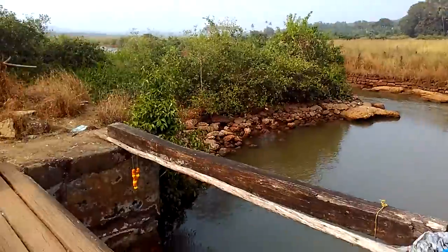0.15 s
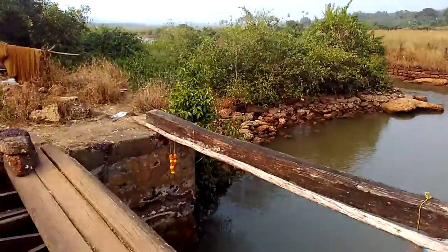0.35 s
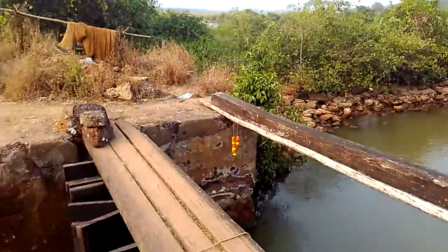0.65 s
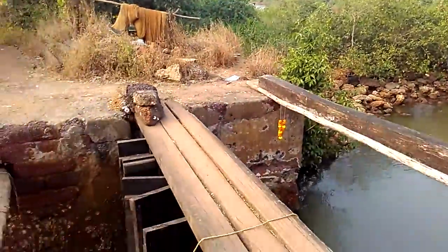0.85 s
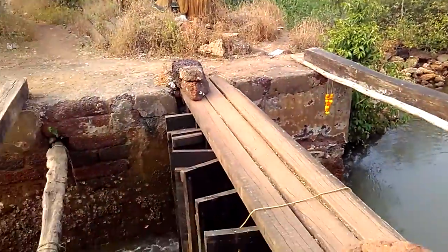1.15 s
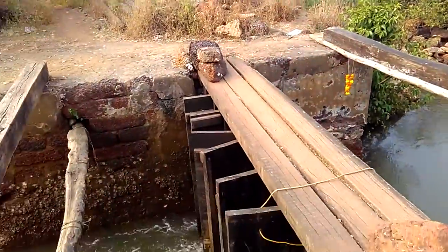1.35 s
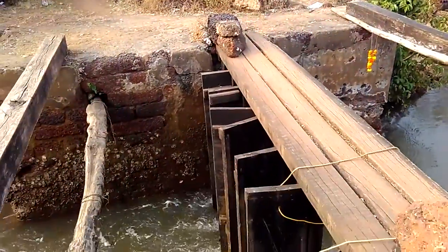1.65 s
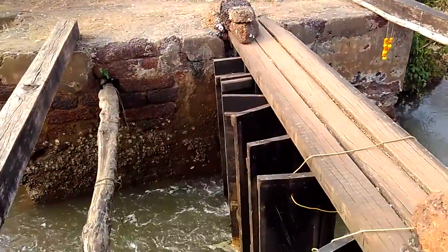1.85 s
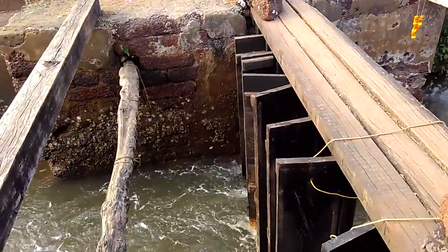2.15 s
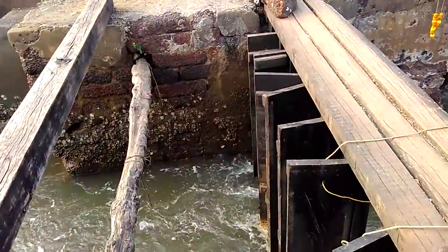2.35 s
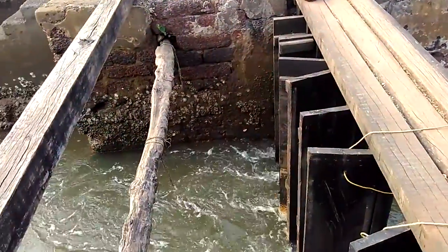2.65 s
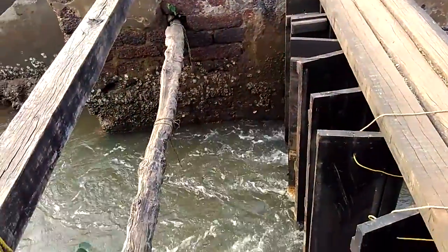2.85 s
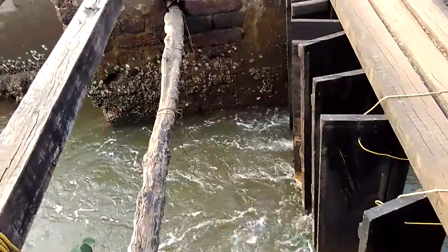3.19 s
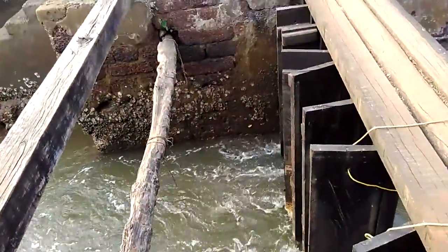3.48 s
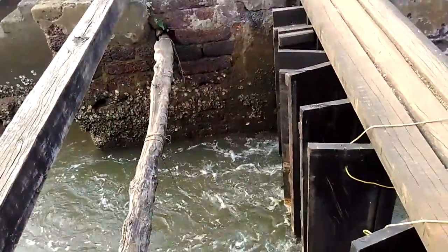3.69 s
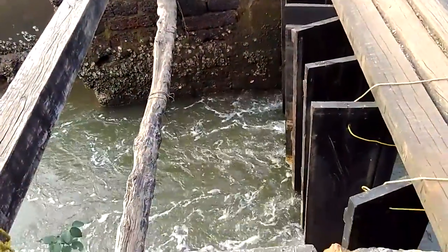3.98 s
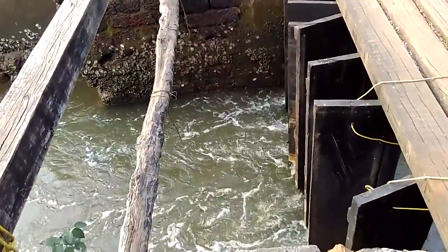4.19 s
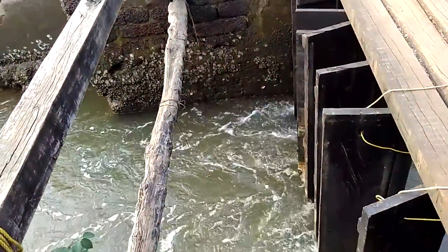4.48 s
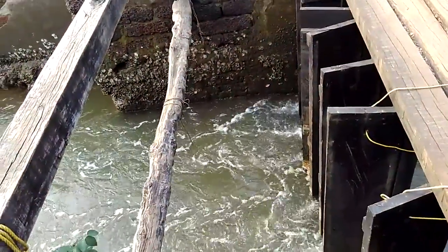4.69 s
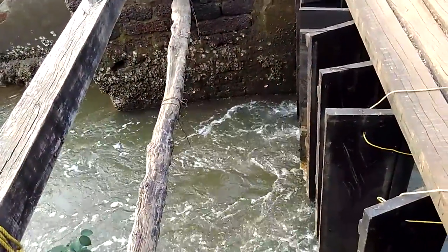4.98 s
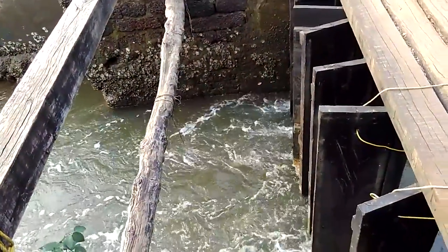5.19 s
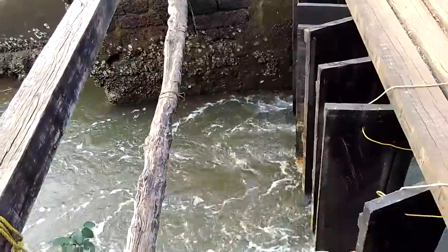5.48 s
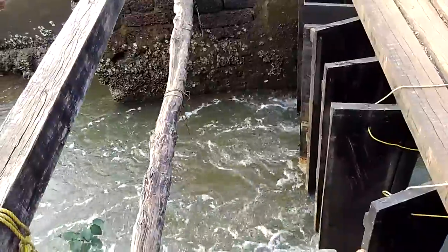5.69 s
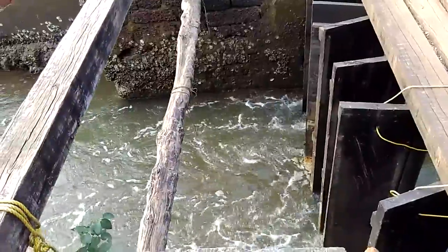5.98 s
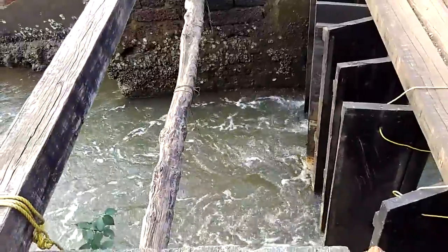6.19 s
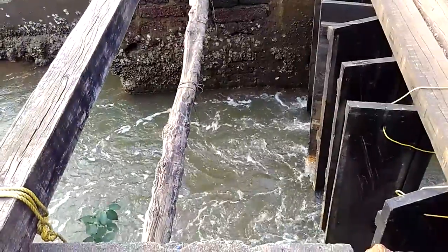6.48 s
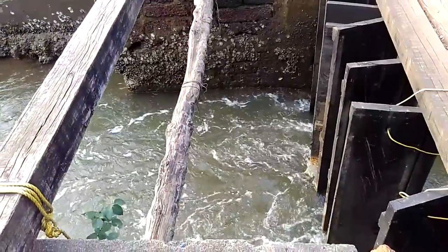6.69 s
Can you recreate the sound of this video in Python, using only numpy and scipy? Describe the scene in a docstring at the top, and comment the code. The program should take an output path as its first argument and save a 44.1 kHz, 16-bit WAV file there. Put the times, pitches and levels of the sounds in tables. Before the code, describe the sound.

Throughout almost seven seconds, stream water rushes through a small wooden sluice in a masonry channel: a dense, foamy wash with middle-pitched churning, fine spray and few distinct bubbles. At first it is heard from aside; from about 2.5 s, as the microphone turns, it grows more open. Gurgling is fullest at 1.7-2.3 s, then eases. Tiny bright drips tick, mostly leftward, with louder ones near 0.5, 2.86 and 5.5 s. Small gulps include a plink at 2.64 s and a lower plop at 4.35 s. A quick hollow clunk sounds at 2.1 s, among strong low wind thumps on the left until 2.4 s. At 3.17 s a sharp, dry click snaps close on the left, with little rebounds and a short hissing tail. Breeze rumbles softly, lulling around 4.2-4.5 s; a very deep bump hits the right at 6 s, and a gust swells at the end.

```python
"""In a masonry channel, a stream pours between the boards of a small wooden sluice; the listening side turns.
Foam noise, ringing bubbles and fine bursts of spray make the rush, coloured and surging differently by pitch.
Puffs of noise tick as drops; short swings of pressure gulp among the boards and make one hollow clunk.
Wind rumbles and bumps now one, now the other of two microphone ports: slow noise and low swings.
One sharp click, made of noise bursts and a fluttering tail of echoes and hiss, sounds close on the left."""
import sys
import numpy as np
from scipy import signal
from scipy.fft import rfft, irfft
from scipy.io import wavfile
from scipy.ndimage import uniform_filter1d, map_coordinates

SR = 44100
rng = np.random.default_rng(int(sys.argv[2]) if len(sys.argv) > 2 else 0)


def wav_record(signal):
    """Record a signal, one row per channel, as 16-bit PCM in the file named by sys.argv[1]."""
    frames = np.transpose(np.atleast_2d(signal))
    bounded = np.clip(frames, -1, 1)
    # unit amplitude maps onto the largest positive 16-bit level
    quanta = np.round(bounded * 32767).astype(np.int16)
    wavfile.write(sys.argv[1], SR, quanta)


N = 301780
TIME = np.arange(N) / SR  # seconds

# Tone colour of the water heard head-on. Each row: pitch in Hz, left gain in dB, right gain in dB.
WATER_COLOUR = [(101, -33, -32), (177, -11, -12.5), (298, -3.5, -7), (540, 0.5, -4.5), (627, -1.5, -5.5),
                (1390, -1.5, -7), (2060, -3, -8), (2473, -11.5, -12), (3210, -17, -17), (4020, -22.5, -16),
                (5450, -12, -15.5), (8230, -17, -19.5), (10490, -1.5, -21), (14000, -19, -28.5),
                (14300, -50, -44)]
# Change of that colour when turned aside. Each row: pitch in Hz, left change in dB, right change in dB.
ASIDE_COLOUR = [(264, -6, -4.5), (470, -15, -12), (790, -5.5, -5), (1360, -4.5, -3.5), (2140, -5.5, -8),
                (2750, -1.5, -2.5), (3840, -0.5, -3), (5100, -11, -6), (8450, -3.5, -3),
                (10560, -16.5, -3.5), (14100, -9, -3)]
# How the ports turn. Each row: time in seconds, share turned aside (0 to 1), lag of the left port in seconds.
TURN = [(0, 0.79, .00023), (.95, 1, .0002), (1.3, 0.7, 0), (2, 0.83, -.00002), (3, 0.43, 0),
        (3.6, 0.3, .00006), (4.6, 0.26, .00006), (5.2, 0.3, -.00002), (6.2, 0.11, -.00002),
        (6.84, 0.54, -.00002)]
# How alike the ports hear the water; below zero means opposite sign. Each row: pitch in Hz, likeness (-1 to 1).
PORT_LIKENESS = [(130, -0.54), (290, -0.93), (630, -0.89), (1370, -0.71), (2100, -0.39), (3000, -0.044),
                 (4200, -0.28), (5200, -0.12), (7000, -0.16), (14000, 0.17)]
# Strength of the flow. Each row: time in seconds, gurgle change in dB, rush change in dB.
FLOW = [(0, 4, 0), (.5, 6.5, 2), (1.1, 5, 2.5), (1.7, 11.5, 2.4), (2.25, 11.5, 4), (2.9, 6.5, 0.5),
        (3.7, 4.5, -1), (4.1, 6.5, 2), (4.45, 4, -1), (5.15, 5, 0.3), (5.7, 0.5, -1.5), (6.25, -0.5, 0.3),
        (6.84, 6, 2.5)]
# Resonances of the masonry channel. Each row: pitch in Hz, width in Hz, lift in dB.
CHANNEL_RESONANCES = [(370, 47, 1.5), (486, 43, 1.5), (630, 18, 2.5), (726, 12, 4.5), (840, 61, 1),
                      (913, 29, 4), (1100, 29, 1), (1286, 11, 4), (1384, 42, 2.5)]
FOAM_SHARE, FOAM_DB = 0.82, 1.59  # the foam follows this share of the rush's swing, plus a lift in dB
# The water is a dense wash: single bubbles stay under it and its patches are mild.
BUBBLE_DB, PLINK_DB, PATCHY_DB = -15, -17, 1.8

# The loudest drops and spatters. Each row: start in seconds, relative level in dB, pitch in Hz,
# left-minus-right in dB, decay in seconds, splash against ring in dB.
DROPS = [(.045, -35, 6440, 12, 0.0039, -16), (0.216, -38.5, 6360, 3, 0.014, -14),
         (.441, -29.5, 11800, 9, 0.0041, -10), (.5025, -19, 5200, -3, 0.0019, -5),
         (.5028, -26, 6360, -2, 0.002, -12), (.655, -35, 7860, 4, 0.0045, -24),
         (0.697, -34, 5400, 6, 0.0049, -14), (.894, -48, 3300, 5, 0.0046, 16),
         (1.183, -35, 5860, 9, .005, -11), (1.275, -44, 3260, -1, 0.037, 6.5),
         (1.598, -36, 8900, 9, 0.0037, -14), (1.738, -29, 9700, 11, 0.0042, -20),
         (1.887, -31, 9500, 20, 0.017, -2), (2.026, -30, 9350, 21, 0.0056, -7),
         (2.577, -35, 6320, 5, .004, -14), (2.639, -24, 2510, 24, 0.009, -12),
         (2.64, -29, 3340, 14, 0.0069, -4), (2.785, -37.5, 2040, 21, 0.04, -17),
         (2.8575, -15, 10300, 13, 0.00089, -18), (3.04, -28, 10500, 15, 0.0037, 0),
         (3.384, -21.5, 10500, 22, 0.0028, -3.5), (4.005, -24, 10700, 12, 0.0034, -2),
         (5.533, -18, 10400, 10, 0.0015, -19), (6.168, -26, 5800, 7, 0.0025, -14),
         (6.472, -27, 10400, 9, 0.0025, -16)]
# Small drops fall at random between them; level and pitch vary up and down by the spread.
DRIP_COUNT, DRIP_DB, DRIP_SPREAD_DB = 16, -35.5, 3
DRIP_HZ, DRIP_OCTAVES = 9700, 0.26
DRIP_BALANCE_DB, DRIP_DECAY_S, DRIP_SPLASH_DB = 3, 0.0028, -24

# Air pockets gulping and plinking among the boards, and the bright ring of a drop at 2.64 s with its rebounds.
# Each row: middle in seconds, level in dB, # pitch in Hz, half length in seconds, left-minus-right in dB.
GULPS = [(.585, -29, 1020, 0.007, 7), (.8143, -29.5, 2130, 0.0033, 15), (.945, -29.5, 700, 0.0064, 5),
         (1.288, -35, 2120, 0.0064, 17), (2.028, -29, 477, 0.009, 6), (2.643, -17.5, 2086, 0.0059, 10.5),
         (2.679, -26, 2020, 0.0034, 12), (2.722, -29, 1890, .006, 5), (3.042, -25, 327, 0.004, 10),
         (3.448, -31, 890, 0.005, 17), (4.35, -18, 480, 0.0082, 11), (4.353, -27.5, 1356, 0.0073, 12),
         (4.336, -30, 425, 0.0043, 10), (4.392, -36, 520, .007, 14), (4.412, -34.5, 447, 0.021, 14)]
# Beats of one hollow clunk. Each row: middle in seconds, level in dB, pitch in Hz,
# half length in seconds, left-minus-right in dB.
CLUNK_BEATS = [(2.076, -26, 610, 0.0054, 6), (2.08, -20, 930, 0.0089, 13), (2.091, -17.5, 943, 0.0071, 13),
               (2.101, -20, 1010, 0.0065, 10), (2.104, -22, 855, 0.0071, 13), (2.108, -36, 321, 0.0087, 9)]
OPPOSED = np.array([[1], [-1]])  # the ports hear the low water sounds in opposite sign

# The close click and its rebounds. Each row: start in seconds, relative level in dB, decay in seconds,
# left-minus-right in dB, body against treble in dB.
CLICKS = [(3.1671, -21, 0.0013, 26, 2), (3.1686, -3, 0.00066, 29, -6.5), (3.1736, -11.5, 0.0011, 24, -23),
          (3.1836, -7, 0.00084, 7, -12), (3.218, -24, 0.0068, 27, 0.5)]
# Tone colour of the click. Each row: pitch in Hz, gain in dB.
CLICK_COLOUR = [(60, -14), (250, 8), (550, 10), (1000, 14), (1500, 4), (2600, 0), (4000, -4), (6000, 1.5),
                (8500, -4.5), (11000, 9), (15000, -17)]
# Tone colour of the click's tail. Each row: pitch in Hz, left gain in dB, right gain in dB.
TAIL_COLOUR = [(60, -8, -26), (200, -3, -10), (320, -2, 0), (496, 7, -9), (700, -0.5, -16), (900, 4, -14),
               (1150, -1, -15), (1430, 7.5, -5), (1700, 1.5, -19), (2050, -9, -9), (2900, -12, -19),
               (4400, -7.5, -21), (6000, -4, -27), (7900, -7.5, -22), (10600, 2.5, -26), (14500, -14, -37)]
# Hollow body of the click and the rattle after it. Each row: middle in seconds, level in dB,
# pitch in Hz, half length in seconds, left-minus-right in dB.
KNOCK = [(3.1694, -6, 545, 0.00152, 11), (3.1697, -14, 1410, 0.0012, 4), (3.173, -19.5, 305, 0.0026, -32),
         (3.1995, -20, 1440, 0.003, 21), (3.212, -17.5, 1460, 0.0027, 24), (3.222, -27.5, 310, 0.0061, -16),
         (3.258, -25, 1020, .003, 18), (3.297, -28, 1400, 0.004, 17), (3.385, -35, 890, .004, 17)]

# Eddies that thump mostly one port, and the low push of air under the click at 3.18 s. Each row: middle in
# seconds, level in dB, pitch in Hz, # half length in seconds, left-minus-right in dB, pitch in Hz of the
# smaller eddy it sheds.
THUMPS = [(0.193, -31, 94, 0.008, -24, 159), (0.388, -25, 49.5, .02, 18, 111),
          (1.184, -28.5, 55, .016, -20, 115), (1.292, -26.5, 74, 0.0087, -22, 141),
          (1.429, -15.5, 70.5, 0.008, -42, 156), (2.061, -16.5, 89, 0.023, 27, 160),
          (2.099, -7.5, 133, .016, 41, 200), (2.122, -7.5, 99, 0.0089, 34, 178),
          (2.15, -22.5, 165, 0.016, 26, 210), (2.196, -20, 132, 0.016, 28, 183),
          (2.248, -36, 112, 0.04, 22, 183), (2.353, -2, 46, .021, 19, 151),
          (2.358, -6.5, 95, 0.014, 21, 188), (2.41, -15, 42.5, 0.027, 18, 150),
          (2.481, -25.5, 40, 0.016, 18, 101), (2.743, -23, 36, 0.02, -21, 80),
          (3.095, -19, 49.7, 0.0065, -22, 79.5), (3.184, -12, 52, .014, 32, 110),
          (3.22, -22, 96.5, 0.0121, 26, 150), (3.657, -24, 35.5, .012, -22, 70),
          (4.808, -18.5, 37.5, 0.015, -27, 85.5), (4.846, -20, 67, 0.0068, -29, 110),
          (4.943, -24.5, 44, .011, -13, 95), (5.213, -26, 51.3, .025, 18, 105),
          (5.661, -22.5, 136.5, .013, -33, 168), (5.781, -21, 97, 0.0077, -27, 149),
          (5.982, 1.5, 34.4, 0.016, -34, 103), (6.021, -20, 80, .008, 23, 150),
          (6.806, -28, 70, .022, -12, 125)]
SHED_DB, SHED_SIDE = -22, 0.71  # the shed eddy is weaker and keeps this share of the left-right difference

# Breeze at both ports, with a lull past the middle. Each row: time in seconds, relative level in dB.
BREEZE = [(0, -41.5), (.4, -37), (.8, -43.5), (1.6, -47), (2.6, -39.5), (3.5, -41), (4.15, -49.5),
          (4.55, -48), (4.95, -42.5), (6.84, -40.5)]
# Gusts that swell and sink on top. Each row: middle in seconds, relative level in dB,
# half length in seconds, left-minus-right in dB.
GUSTS = [(.3, -39.5, 0.18, -16), (1.443, -30, 0.21, -11), (1.703, -33.5, 0.18, 2), (2.28, -27, 0.17, 4.5),
         (2.663, -37, 0.16, -3), (3.538, -32, 0.03, -20), (3.95, -32.5, 0.051, 21),
         (4.924, -33.5, 0.21, -11), (5.14, -31, 0.11, 13), (5.93, -28, 0.2, -5.5), (6.49, -33.5, 0.13, 16),
         (6.842, -21.5, 0.048, -14)]
# Tone colour of the wind's rumble. Each row: pitch in Hz, gain in dB.
RUMBLE_COLOUR = [(5, 13), (14, 6), (30, 3), (50, -0.5), (80, -9.5), (130, -21.5), (200, -37.5), (400, -40),
                 (1000, -92)]
# Tone colour of the buffeting by small eddies. Each row: pitch in Hz, gain in dB.
BUFFET_COLOUR = [(30, 4), (70, 9), (110, 1), (180, -11), (300, -33), (800, -68)]
RESTLESS_DB, LUMPY_DB = 2.6, 4.5  # how much the breeze wavers, and how lumpy its buffeting is

EDGE_HZ = 14550  # upper limit of the whole sound


def stream(level_db=-29.5, foam_db=0.24, spray_db=-5.0, flutter_db=0.8, slosh_db=1.5, swell_db=0.5):
    """Foam, bubbles and spray surge with the flow and reach two ports that turn beside them."""
    source = gain_of(foam_db) * rng.standard_normal((2, N))
    trickle = [bubbles(per_s=26, spread_db=4.0, cycles=9.35, rise=0.0283, count=30) for _ in range(2)]
    source += gain_of(BUBBLE_DB) * np.array(trickle)
    # rarer bubbles that ring for more cycles: single plinks
    plinks = [bubbles(per_s=2.2, spread_db=2.5, cycles=12, rise=.02, count=30) for _ in range(2)]
    source += gain_of(PLINK_DB) * np.array(plinks)
    source += gain_of(spray_db) * spray(per_s=350, spread_db=3.5, burst_s=0.0013)

    # split into short frames of pitches, so that colour can change with time
    hz, s, (one, other) = signal.stft(channel(source), SR, nperseg=1024, noverlap=768)
    aside, lag_s = curve(TURN, s)
    alike = np.clip(read(PORT_LIKENESS, hz)[0], -1, 1)[:, None]
    left = one * np.exp(-2j * np.pi * hz[:, None] * lag_s)
    right = alike * one + np.sqrt(1 - alike ** 2) * other
    ports = np.array([left, right])

    # big bubbles govern the low range, churning the middle, foam the top
    ranges = read([(450, 1, 0, 0), (900, 0, 1, 0), (2300, 0, 1, 0), (4500, 0, 0, 1)], hz)
    gurgle, rush = curve(FLOW, s)
    slosh, swell = wander(s, per_s=5.8, count=2)
    low = gurgle + slosh_db * slosh
    middle = rush + swell_db * swell
    top = FOAM_DB + FOAM_SHARE * rush + swell_db * swell
    surge = ranges.T @ np.array([low, middle, top])

    # small waves change the brightness of patches of the spectrum, and the whole rush flutters
    patches = uniform_filter1d(rng.standard_normal(one.shape), size=5, axis=1)
    patches = evened(uniform_filter1d(patches, size=16, axis=0))
    flutter = evened(uniform_filter1d(rng.standard_normal(len(s)), size=7))
    colour = read(WATER_COLOUR, hz)[..., None] + read(ASIDE_COLOUR, hz)[..., None] * aside
    ports *= gain_of(level_db + colour + surge + PATCHY_DB * patches + flutter_db * flutter)
    return signal.istft(ports, SR, nperseg=1024, noverlap=768)[1][:, :N]


def bubbles(per_s, spread_db, cycles, rise, count):
    """Bubbles of many sizes ring and rise in pitch as they near the surface."""
    out = np.zeros(N)
    for hz in np.geomspace(260, 3200, count) * rng.uniform(1.0, 1.04, count):
        age = TIME[:int(5 * cycles / hz * SR)] * hz / cycles  # counted in decay times
        outline = np.exp(-age) * (1 - np.exp(-6 * age))
        ring = np.sin(2 * np.pi * cycles * age * (1 + rise * age)) * outline
        births = impacts(per_s * (hz / 1000) ** .8, spread_db)  # small bubbles come more often
        out += np.sqrt(hz) * evened(signal.oaconvolve(births, ring)[:N])
    return evened(out)


def spray(per_s, spread_db, burst_s):
    """Droplets land, each a tiny burst of fizz with a soft start."""
    fade = np.exp(-2 / (burst_s * SR))
    landings = impacts(per_s, spread_db) ** 2 + 1e-12
    power = signal.lfilter([1], np.poly([fade, fade]), landings)
    fizz = np.sqrt(abs(power)) * rng.standard_normal((2, N))
    return evened(coloured(fizz, [(300, -2), (2000, -3.0), (5000, 6.5), (15000, 10.0)]))


def channel(x):
    """The channel strengthens the pitches at which it resonates."""
    hz = np.fft.rfftfreq(x.shape[-1], 1 / SR)
    lift_db = sum(db * np.exp(-(2 * (hz - centre) / width) ** 2) for centre, width, db in CHANNEL_RESONANCES)
    return irfft(rfft(x) * gain_of(lift_db), x.shape[-1])


def drops(level_db=-2.5, ring_spread=2.1, rise_s=0.0014):
    """A drop sets a cluster of tiny bubbles ringing inside a puff of splash."""
    out, t = np.zeros((2, N)), TIME[:4096]
    for s, db, hz, balance_db, decay_s, splash_db in DROPS + drips():
        puff = rng.standard_normal((3, len(t)))
        ping = evened(coloured(puff[0], [(hz / ring_spread, -40), (hz, 0), (hz * ring_spread, -40)]))
        splash = evened(coloured(puff[1:], [(500, 2), (2000, -7), (7000, -1), (15000, -16.0)]))
        outline = np.exp(-t / decay_s) * (1 - np.exp(-t / rise_s))
        sound = (ping + gain_of(splash_db) * splash) * outline
        add(out, s, gain_of(db + level_db) * sound, balance_db)
    return walls(out, t60=.45, wet_db=-9)


def drips():
    """Small drops fall at random times, strengths and pitches, given as rows like those of DROPS."""
    rows = []
    for moment, size, pitch in rng.random((DRIP_COUNT, 3)):
        db = DRIP_DB + DRIP_SPREAD_DB * (2 * size - 1)
        hz = DRIP_HZ * 2 ** (DRIP_OCTAVES * (2 * pitch - 1))
        rows.append((moment * N / SR, db, hz, DRIP_BALANCE_DB, DRIP_DECAY_S, DRIP_SPLASH_DB))
    return rows


def gulps():
    """Air pockets pulse among the boards, and one drop rings with its rebounds, as short swings of pressure
    that echo in the channel."""
    return walls(OPPOSED * swings(GULPS, glide=0.002, rough=0.076, churn=0.043), t60=0.41, wet_db=-8.5)


def clunk(wet_db=-11):
    """A quick, rough run of hollow beats echoes briefly in the channel."""
    return walls(OPPOSED * swings(CLUNK_BEATS, glide=0.005, rough=0.25, churn=0.079), t60=0.73, wet_db=wet_db)


def click(tail_db=-20.5, early_db=-14.5, early_s=0.035, late_s=0.14):
    """A hard tick on a solid push of air, a few rebounds, then a tail that dies fast at first, then slowly."""
    out, t = swings(KNOCK, glide=0, rough=0.15, churn=0.075), TIME[:SR]
    for s, db, decay_s, balance_db, body_db in CLICKS:
        age = t[:4096] - t[512]  # starts early, leaving room for the filters to spread
        crack = rng.standard_normal((2, len(age))) * np.exp(-abs(age) / decay_s) * (age >= 0)
        crack = coloured(crack, [(1800, body_db), (4000, 0)])
        add(out, s + age[0], gain_of(db) * coloured(crack, CLICK_COLOUR), balance_db)
    dying = np.hypot(gain_of(early_db) * np.exp(-t / early_s), gain_of(tail_db) * np.exp(-t / late_s))
    # the body of the tail is a crowd of echoes; its treble is a hiss, and both flutter
    echoes = evened(np.array([impacts(per_s=1500, spread_db=2)[:SR] for _ in range(2)]))
    body = coloured(echoes, [(1200, 2.5), (1800, 0), (3500, -12)])
    hiss = coloured(rng.standard_normal((2, len(t))), [(1800, -9), (3500, 0)])
    grain = (body + hiss) * gain_of(2.2 * wander(t, per_s=110, count=1) - .5)
    onset = 1 - np.exp(-t / 0.0074)
    add(out, CLICKS[0][0] - .003, coloured(grain, TAIL_COLOUR) * dying * onset, 0)
    return out


def swings(rows, glide, rough, churn):
    """Short swings of pressure grow and die, gliding in pitch and breaking up into turbulence."""
    out = np.zeros((2, N))
    for s, db, hz, half_s, balance_db in rows:
        u = np.arange(-4, 4, 1 / (half_s * SR))  # time from the middle, counted in half lengths
        wobble = signal.resample(rng.standard_normal(24), len(u))
        phase = 2 * np.pi * hz * half_s * (u + glide * u ** 2) + rough * wobble
        swing = np.sin(phase) / np.cosh(2.37 * u)
        # the turbulence is wider in pitch and lasts longer than the swing
        band = [(hz / 3, -25), (hz, 0), (hz * 2, -14), (hz * 8, -90)]
        turbulence = evened(coloured(rng.standard_normal(SR), band))[:len(u)] / np.cosh(0.17 * u)
        sound = signal.windows.hann(len(u)) * (swing + churn * turbulence)
        add(out, s + u[0] * half_s, gain_of(db) * sound, balance_db)
    return out


def thumps():
    """Each eddy of wind, and the push of air under the click, strikes a port and sheds a smaller, rougher one."""
    main = [row[:5] for row in THUMPS]
    shed = [(s, db + SHED_DB, shed_hz, half_s, SHED_SIDE * balance_db)
            for s, db, _, half_s, balance_db, shed_hz in THUMPS]
    strikes = swings(main, glide=-0.04, rough=0.07, churn=0.11)
    return strikes + swings(shed, glide=-0.015, rough=0.3, churn=0.49)


def wind(level_db=1, buffet_db=-16):
    """Breeze and gusts give each port its own rumble, with a lumpy buffeting above it."""
    power = gain_of(curve(BREEZE, TIME) + RESTLESS_DB * wander(TIME, per_s=7.9, count=2)) ** 2
    for s, db, half_s, balance_db in GUSTS:
        gust = gain_of(db) ** 2 * np.exp(-((TIME - s) / half_s) ** 2)
        add(power, 0, gust, 2 * balance_db)  # doubled because this is power
    lumps = evened(uniform_filter1d(rng.standard_normal((2, N)), size=1500))
    rumble = coloured(rng.standard_normal((2, N)), RUMBLE_COLOUR)
    buffet = coloured(rng.standard_normal((2, N)) * gain_of(LUMPY_DB * lumps), BUFFET_COLOUR)
    return np.sqrt(power) * (gain_of(level_db) * evened(rumble) + gain_of(buffet_db) * evened(buffet))


def walls(x, t60, wet_db):
    """The channel's walls add scattered echoes that sink by 60 dB in t60 seconds."""
    t = TIME[:SR // 2]
    scattered = rng.standard_normal((2, len(t))) * (rng.random((2, len(t))) < .05)
    taps = scattered * gain_of(-60 * t / t60) * (t > .006)
    echoes = signal.oaconvolve(x, evened(taps) / np.sqrt(len(t)), axes=1)[:, :N]
    return x + gain_of(wet_db) * echoes


def impacts(per_s, spread_db):
    """Single-sample clicks come at random moments: many small, a few large."""
    size = gain_of(spread_db * np.minimum(rng.exponential(1, N), 4.5))
    return size * rng.choice([-1, 1], N) * (rng.random(N) < per_s / SR)


def wander(s, per_s, count):
    """Several unrelated slow random curves, together of rms 1, at the times s."""
    knots = rng.standard_normal((count, 256))
    return evened(np.array([map_coordinates(k, [s * per_s], mode="mirror") for k in knots]))


def add(mix, s, sound, balance_db):
    """Mixes a sound in at time s; the far port hears it weaker."""
    part = mix[:, max(round(s * SR), 0):][:, :sound.shape[-1]]
    part += gain_of(np.minimum([[balance_db], [-balance_db]], 0)) * sound[..., :part.shape[1]]


def coloured(x, rows):
    """Filters x by one tone colour, or by one for each port."""
    gain = gain_of(read(rows, np.fft.rfftfreq(x.shape[-1], 1 / SR))).squeeze()
    return irfft(rfft(x) * gain, x.shape[-1])


def read(rows, hz):
    """Every column of a pitch table at the pitches hz, on a logarithmic scale."""
    at, *columns = np.transpose(rows)
    return np.array([np.interp(np.log(hz + 1), np.log(at + 1), c) for c in columns])


def curve(rows, s):
    """Every column of a time table at the times s."""
    at, *columns = np.transpose(rows)
    return np.array([np.interp(s, at, c) for c in columns])


def evened(x):
    """Scales to rms 1."""
    return x / np.sqrt(np.mean(x ** 2) + 1e-20)


def gain_of(db):
    """Turns decibels into a factor."""
    return 10 ** (np.asarray(db) / 20)


def scene():
    """The stream with its drops, gulps and clunk, the click, and the wind with its thumps."""
    water = stream() + drops() + gulps() + clunk()
    return water + click() + thumps() + wind()


def record(dry):
    """Rounds off loud peaks, then removes everything above the upper limit."""
    rounded = dry / (1 + (dry / .72) ** 4) ** (1 / 4)
    lowpass = signal.firwin(511, EDGE_HZ, window=("kaiser", 9), fs=SR)
    return signal.oaconvolve(rounded, lowpass[None], "same")


dry = scene()
out = record(dry)
wav_record(out)
```